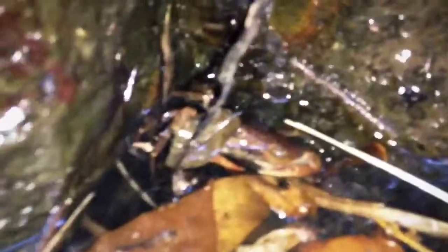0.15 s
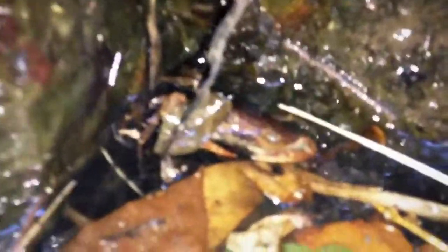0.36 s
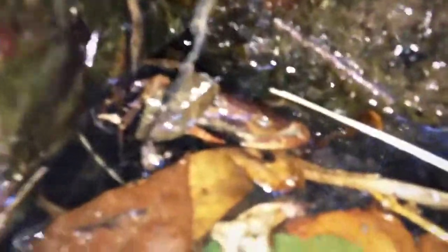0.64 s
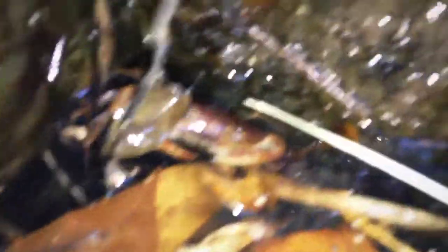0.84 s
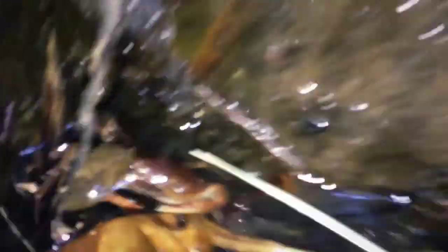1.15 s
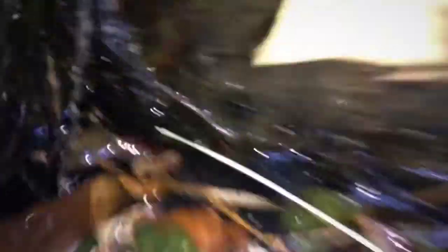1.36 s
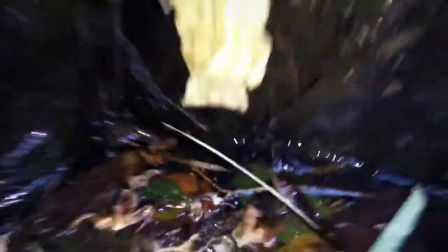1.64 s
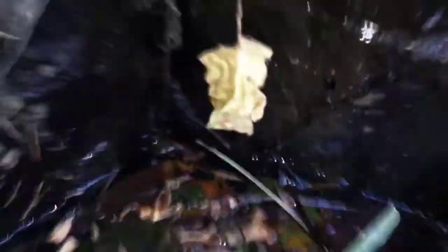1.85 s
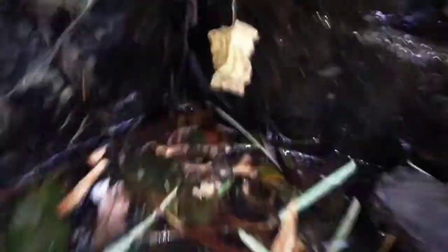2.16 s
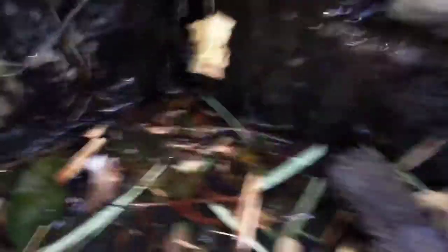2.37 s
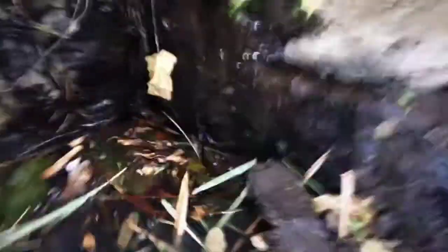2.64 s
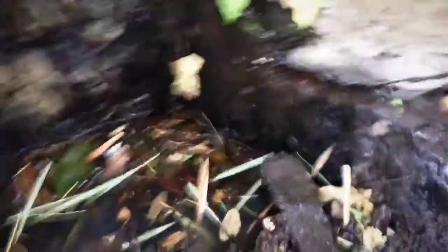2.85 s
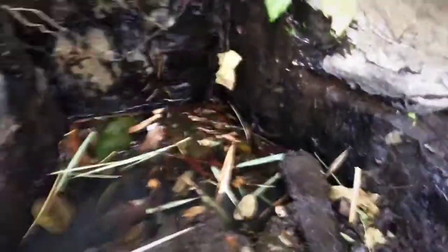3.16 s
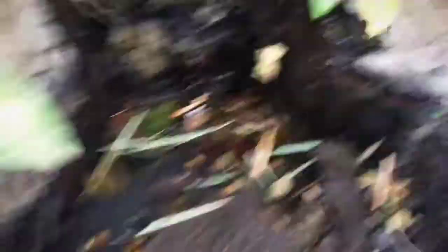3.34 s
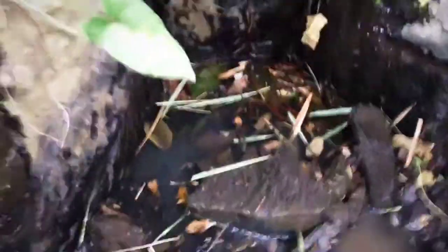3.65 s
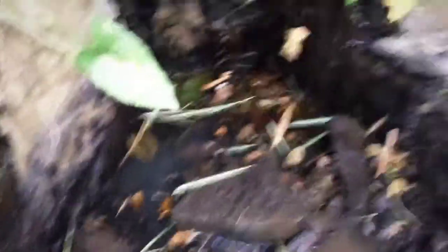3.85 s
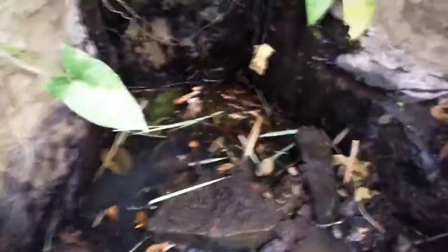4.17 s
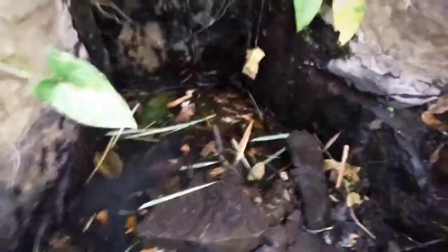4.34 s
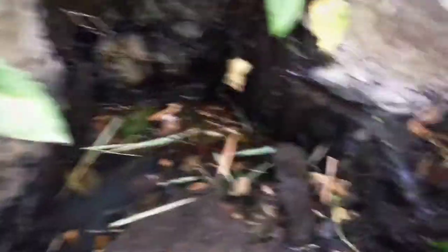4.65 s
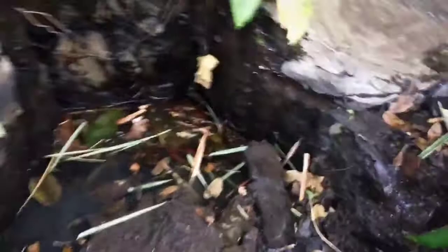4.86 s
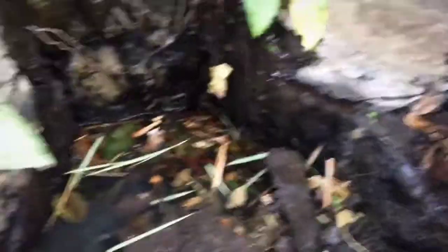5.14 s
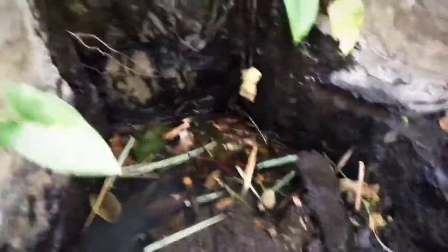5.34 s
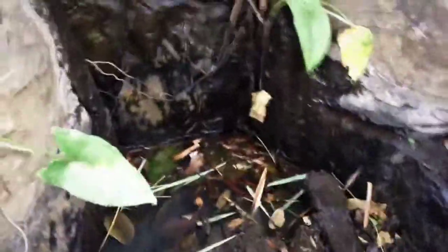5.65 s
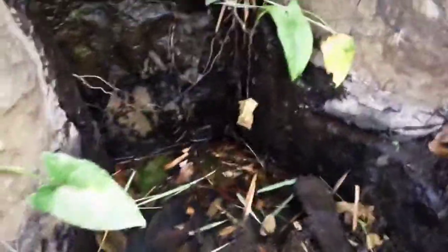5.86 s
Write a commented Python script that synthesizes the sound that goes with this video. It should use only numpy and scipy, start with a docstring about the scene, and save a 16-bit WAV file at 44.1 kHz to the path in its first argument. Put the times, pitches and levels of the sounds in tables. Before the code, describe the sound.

Outdoors, sodden leaf litter is disturbed near the microphone. Quiet fizzing ticks lead into thicker rustling and crunching with soft low thumps and a brief air rumble. A pause, then dense bright crackles and a loud twig crack, a few more crunches, and sparse dry clicks over a faint low murmur. The sound is dry and near, slightly boxy.

```python
"""Wet dead leaves squelch, rustle and fizz in swells close to a hand-held microphone, in a stone hollow by a pool.
Litter is filtered noise driven by tiny breaks, plus damped-sine pops; crunches are swelling noise bursts, snaps
sharp bursts with a ring. Damped tones thump through the ground and moving air rumbles on the microphone. A near
stone wall adds a dull echo of changing delay, the hollow its air modes."""
import sys
import numpy as np
from scipy import signal
from scipy.fft import rfft, irfft, next_fast_len
from scipy.io import wavfile
from scipy.ndimage import uniform_filter1d, map_coordinates

SR = 44100
rng = np.random.default_rng(int(sys.argv[2]) if len(sys.argv) > 2 else 0)


def store_pcm(level_fs):
    """Save levels as 16-bit WAV."""
    pcm = np.round(np.clip(level_fs, -1, 1) * 32767).astype(np.int16)
    wavfile.write(sys.argv[1], SR, np.atleast_2d(pcm).T)


def magnitude_from_level(level_db):
    """Linear magnitude for a level in decibels (20 dB per decade)."""
    exponent = np.asarray(level_db, float) / 20
    return 10 ** exponent


N = 264579  # samples


def unit(x):
    """Scaled to rms 1."""
    return x / np.sqrt(np.mean(x ** 2) + 1e-20)


def peaked(x):
    """Scaled to peak 1."""
    return x / np.abs(x).max()


def curves(rows):
    """One value per sample for each column after the time."""
    s, *columns = np.transpose(rows)
    return [np.interp(np.arange(N) / SR, s, column) for column in columns]


def coloured(x, points):
    """x filtered by (Hz, dB) points read on a log frequency axis."""
    hz, db = np.transpose(points)
    size = next_fast_len(x.shape[-1] + 8192)
    bin_hz = np.fft.rfftfreq(size, 1 / SR)
    gain = magnitude_from_level(np.interp(np.log(bin_hz + 1), np.log(hz), db))
    return irfft(rfft(x, size) * gain, size)[..., :x.shape[-1]]


def wobble(knots_per_s):
    """A smooth random curve through normally distributed knots."""
    position = np.arange(N) * knots_per_s / SR
    return map_coordinates(rng.standard_normal(200), [position])


def patchy(patchy_db):
    """Noise with random loud and quiet patches in time and frequency."""
    spectrum = signal.stft(rng.standard_normal(N), nperseg=256)[2]
    field = uniform_filter1d(rng.standard_normal(spectrum.shape), size=8, axis=0)
    field = uniform_filter1d(field, size=6, axis=1)
    return signal.istft(spectrum * magnitude_from_level(patchy_db * unit(field)), nperseg=256)[1][:N]


def cracks(rate_hz, spread_db, life_s):
    """Envelope of tiny fibre breaks: sudden starts, rare big ones, quick decay."""
    when, size = rng.random(N), rng.exponential(size=N)
    kicks = (when < rate_hz / SR) * magnitude_from_level(spread_db * np.minimum(size, 5))
    return unit(signal.lfilter([1], [1, -np.exp(-1 / (life_s * SR))], kicks))


def pops(count, centre_hz, cycles, spread_db):
    """Wet ticks of varied pitch: each a damped sine a few cycles long."""
    when, tone, size = rng.random((3, count, 1))
    hz = centre_hz * 2 ** (2.6 * (tone - 0.5))  # 2.6 octaves in all
    k = np.arange(1024)
    decay = np.exp(-k * hz / (cycles * SR))
    rings = magnitude_from_level(-spread_db * np.log(size + 0.0045)) * decay * np.sin(2 * np.pi * hz * k / SR)
    place = k + (when * N).astype(int)
    return unit(np.bincount(place.ravel(), rings.ravel())[:N])


def litter():
    """Three depths of litter under one stirring; the same fibre breaks are heard in all of them."""
    # Each row: time in seconds, level of the leaf layer in dB.
    stir_rows = [(0, -72.5), (0.3, -71), (0.55, -78), (0.8, -65.5), (0.91, -75), (1.15, -70), (1.45, -64),
                 (1.68, -55), (1.82, -60), (2.08, -53), (2.18, -48.5), (2.42, -47.5), (2.6, -42.5),
                 (2.68, -49), (2.82, -51.5), (2.94, -65), (3.15, -68.5), (3.39, -68.5), (3.44, -57),
                 (3.52, -45), (3.65, -40), (3.69, -56), (3.76, -43), (3.92, -45.5), (3.95, -49),
                 (4.06, -53.5), (4.12, -49.5), (4.19, -50.5), (4.3, -47.5), (4.41, -48.5), (4.5, -56),
                 (4.72, -55.5), (4.82, -66.5), (4.95, -57.5), (5.17, -67), (5.27, -63.5), (5.56, -68),
                 (5.64, -55), (5.8, -55), (6, -60)]
    # Each row: time in seconds, soggy layer over the leaves in dB, crisp edges over the leaves in dB.
    depth_rows = [(0, 0.5, -4), (0.33, -2.5, -1), (0.58, -0.5, -20), (0.8, -2, -3), (1.2, -4.5, -2.5),
                  (2.2, -2, -2.5), (2.5, -6.5, -4), (2.85, -2, 6.5), (3.3, -2, -2.5), (3.46, -14, 9.5),
                  (3.6, -8.5, 0), (3.8, -17, 0.5), (4.1, -8, -1.5), (4.35, -5, 7.5), (4.7, -2, 0.5),
                  (5.3, -2, 4), (6, -3.5, 2.5)]
    # Layer colours. Each row: frequency in Hz, relative density in dB.
    soggy_colour = [(120, -70), (230, -33), (330, -8), (500, -14.5), (750, -5.5), (1100, 0.5), (2000, 3.5),
                    (3500, -4), (8000, -13.5)]
    leaf_colour = [(250, -67), (800, -9), (1600, -12), (2500, 0.5), (4500, 3), (7000, 1), (11000, -4.5),
                   (16000, -30)]
    edge_colour = [(700, -79), (2500, -35), (5500, -1), (8000, 1), (11000, -0.5), (14500, 0), (15700, -9)]

    stir_db, = curves(stir_rows)
    soggy_db, edge_db = curves(depth_rows)
    slips = uniform_filter1d(cracks(rate_hz=150, spread_db=3.5, life_s=0.024), size=300)  # leaves slipping
    ticks = cracks(rate_hz=1300, spread_db=16.0, life_s=0.00033)  # single veins breaking

    def layer(colour, slip, tick):
        """Patchy noise driven by the shared slips and ticks."""
        drive = 1 + slip * slips + tick * ticks
        return unit(coloured(patchy(patchy_db=2.5) * drive, colour))

    soggy = magnitude_from_level(soggy_db + 1.5 * wobble(14)) * layer(soggy_colour, slip=0.45, tick=0.12)
    leaves = layer(leaf_colour, slip=0.6, tick=0.12)
    edges = magnitude_from_level(edge_db) * layer(edge_colour, slip=0.6, tick=0.25)
    wet = magnitude_from_level(-12.0) * pops(count=2500, centre_hz=3610, cycles=2.9, spread_db=4.5)
    squelch = magnitude_from_level(soggy_db - 9.5) * pops(count=500, centre_hz=1146, cycles=7.1, spread_db=2.0)
    return magnitude_from_level(stir_db) * (soggy + leaves + edges + wet + squelch)


def air():
    """Lumpy rumble on the microphone itself, and a low murmur of the surroundings."""
    # Each row: time in seconds, rumble level in dB, murmur level in dB.
    air_rows = [(0, -69, -67), (0.5, -69.5, -70), (1.0, -67.5, -65), (1.9, -66.5, -66),
                (2.12, -53.5, -68.5), (2.24, -48.5, -61.5), (2.5, -60, -65.5), (2.8, -65, -58),
                (3.0, -71.5, -73), (3.3, -73, -71), (3.8, -87, -68.5), (4.3, -61.5, -59.5), (4.7, -85, -66),
                (5.0, -73.5, -71), (5.6, -70, -68.5), (5.85, -65, -62.5), (6, -68, -70)]
    # Colours. Each row: frequency in Hz, relative density in dB.
    rumble_colour = [(20, -55), (40, -11), (70, -0.5), (95, -2.5), (130, -8.5), (250, -29.5)]
    murmur_colour = [(90, -35), (150, -7.5), (195, 1.5), (260, -5), (370, -2.5), (500, -5.5), (750, -10),
                     (1200, -27)]

    rumble_db, murmur_db = curves(air_rows)
    rumble = unit(magnitude_from_level(0.13 * wobble(9)) * coloured(rng.standard_normal(N), rumble_colour))
    murmur = unit(magnitude_from_level(1.5 * wobble(20)) * coloured(rng.standard_normal(N), murmur_colour))
    return magnitude_from_level(rumble_db) * rumble, magnitude_from_level(murmur_db) * murmur


def burst(shape, luck, hz, levels_db, sharp):
    """One break: broad crack, treble sizzle, the ring of that piece and a low knock under one envelope."""
    # Colours of the parts. Each row: frequency in Hz, relative density in dB.
    crack_colour = [(100, -68), (500, -54), (1500, -0.5), (3000, 6.5), (6000, 9), (9000, 3.5), (17000, -48)]
    sizzle_colour = [(500, -70), (3000, -69), (7000, 8), (9000, 11), (14000, 6), (15700, -3)]
    knock_colour = [(60, -74), (150, -12), (300, -4.5), (600, -2.5), (1200, 1.5), (2200, -1.5), (5000, -32)]

    ring_colour = [(hz / 8, -80), (hz / 2, -36), (hz / sharp, -6), (hz, 0), (hz * sharp, -6), (hz * 2, -36)]
    colours = [crack_colour, sizzle_colour, ring_colour, knock_colour]
    total = 0
    for noise, colour, db in zip(luck, colours, levels_db):
        total = total + magnitude_from_level(db) * coloured(noise * shape, colour) / np.std(coloured(noise, colour))
    return total


def crunches():
    """A crunch swells and fades as many small breaks follow one another; a longer one swells longer."""
    # Leaves crushed. Each row: start in seconds, peak in dB, ring in Hz, relative low knock in dB, t60 in seconds.
    crunch_rows = [(0.074, -52.5, 8220, -2, 0.11), (0.823, -47, 4100, -5, 0.062),
                   (0.965, -43.5, 5800, -13, 0.11), (0.9996, -48, 3390, -1, 0.08),
                   (1.3234, -38, 3460, -16, 0.098), (1.3495, -40, 3960, -11.5, 0.11),
                   (1.3732, -41.5, 3960, -12, 0.051), (1.4209, -37, 8060, -15, 0.081),
                   (1.534, -34.5, 2120, -9, 0.075), (1.5632, -34, 2240, -18, 0.041),
                   (1.619, -46, 3900, -20, 0.074), (1.769, -36.5, 4650, -14, 0.034),
                   (1.8417, -43, 1510, -6, 0.043), (1.9435, -33.5, 4430, -6.5, 0.2),
                   (2.0171, -30, 2260, -18, 0.044), (2.1112, -35, 2130, -16, 0.24),
                   (2.1648, -38, 2030, 2, 0.17), (2.256, -29, 3920, -7, 0.032),
                   (2.2889, -28, 2120, -5, 0.024), (2.3742, -35, 1820, -12, 0.049),
                   (2.4715, -25, 3700, -4.5, 0.055), (2.501, -27, 3460, -12.5, 0.033),
                   (2.5595, -29.5, 3730, -5.5, 0.31), (2.619, -28, 6900, -16.5, 0.066),
                   (2.8145, -33.5, 1650, -11, 0.054), (2.9886, -46.5, 5340, -6, 0.16),
                   (3.399, -36, 8010, -15, 0.19), (3.418, -22.5, 12000, -27, 0.13),
                   (3.5346, -26.5, 8300, -7.5, 0.028), (3.598, -28.5, 1820, -18, 0.24),
                   (3.6375, -27, 6700, -17.5, 0.17), (3.8344, -33, 6560, -31, 0.099),
                   (3.8618, -29, 4800, -20, 0.068), (4.204, -29, 1880, -16, 0.095),
                   (4.2308, -31, 9900, -5, 0.15), (4.2569, -32.5, 1430, 5, 0.051),
                   (4.3847, -32.5, 6400, -6, 0.074), (4.4294, -40, 10500, 2, 0.098),
                   (4.7029, -34.5, 2900, -3, 0.054), (4.9019, -25, 5400, 0, 0.076),
                   (4.9093, -26, 1990, -6.5, 0.11), (4.9507, -34, 5900, -7, 0.03),
                   (4.9896, -45, 8480, -13, 0.11), (5.6385, -35.5, 13200, -11, 0.17),
                   (5.6655, -38, 2140, -7, 0.092), (5.7544, -29, 8000, -38, 0.047)]

    out, t = np.zeros(N + SR), np.arange(SR // 6) / SR
    luck = rng.standard_normal((len(crunch_rows), 5, len(t)))
    for (s, db, hz, knock_db, t60_s), (grit, *noise) in zip(crunch_rows, luck):
        rise_s = 0.003 + 0.05 * t60_s
        swell = np.sin(np.pi / 2 * np.minimum(t / rise_s, 1)) ** 2
        fade = magnitude_from_level(-60 * np.maximum(t - rise_s, 0) / t60_s)
        uneven = magnitude_from_level(2 * unit(uniform_filter1d(grit, size=24)))  # 2 dB rms
        crunch = burst(swell * fade * uneven, noise, hz, [-4, -6, -7, knock_db], sharp=0.88)
        out[round(s * SR):][:len(t)] += magnitude_from_level(db) * peaked(crunch)
    return out[:N]


def snaps():
    """A snap starts at once, sets the twig ringing briefly and leaves a faint settling."""
    # Twigs and veins. Each row: start in seconds, peak in dB, ring in Hz, relative low knock in dB,
    # relative treble in dB.
    snap_rows = [(0.361, -53, 7600, -18, 0), (0.4189, -44.5, 880, -4, -7), (1.1362, -45.5, 7200, -28, -14),
                 (1.816, -36.5, 1440, -13, 3), (1.9428, -35, 850, -14, 0), (2.457, -26.5, 1155, 10, -20),
                 (2.7276, -21, 2020, 5.5, 0.5), (2.974, -42, 2800, -19, 0), (3.1334, -40.5, 5600, -21, -8),
                 (3.2055, -43.5, 5770, -22, -5), (3.3401, -24, 1520, -9.5, -10),
                 (3.709, -27.5, 3340, -42, -14), (3.7261, -20.5, 7550, -40, -4),
                 (3.7525, -15.5, 3100, -36, -7.5), (3.7626, -22.5, 4800, -10, -11),
                 (3.7939, -7.5, 12800, -10, -10), (3.875, -26, 2360, -7, -27), (3.89, -21, 6230, -6.5, -3),
                 (3.915, -24, 4860, -33, 2), (3.961, -24, 7600, -26, 4), (4.0033, -20, 3810, -37, -4.5),
                 (4.0139, -27.5, 2540, -1, 1), (4.0632, -35, 2460, -13, -11), (4.0988, -27, 4920, -15, -11),
                 (4.1184, -22, 3360, -35, -7), (4.1506, -28, 1395, -27, -14), (4.286, -35, 6100, -16, 0),
                 (4.4622, -31.5, 925, 4, -13), (4.5528, -33.5, 5830, -15, -3), (4.5872, -28, 6900, -5, 3),
                 (4.837, -43, 2550, -5, -8), (4.8696, -40.5, 1630, -6, -13), (5.0272, -39.5, 6550, -8, -9),
                 (5.2116, -42, 7120, -20, -3), (5.353, -39.5, 3500, -16, -9), (5.3908, -43, 6270, -14, -1),
                 (5.418, -38, 6770, -14.5, -18), (5.4583, -38, 8800, -7, -6),
                 (5.5415, -39.5, 1580, -20, -10), (5.7009, -50, 6100, 3, -8), (5.827, -36, 5030, -12, -5),
                 (5.854, -39, 5630, -11, -9)]
    snap_t60_s, settle_t60_s, settle_db = 0.025, 0.13, -14

    out, t = np.zeros(N + SR), np.arange(SR // 10) / SR
    luck = rng.standard_normal((len(snap_rows), 4, len(t)))
    luck[:, :, 0] = 3.5  # the break itself is one sharp step
    decay = magnitude_from_level(-60 * t / snap_t60_s)
    settling = magnitude_from_level(settle_db - 60 * t / settle_t60_s)
    for (s, db, hz, knock_db, treble_db), noise in zip(snap_rows, luck):
        noisy = burst(decay + settling, noise, hz, [-4.1, treble_db, -9, knock_db], sharp=1.3)
        ring = magnitude_from_level(-4.5) * decay ** 0.8 * np.sin(2 * np.pi * hz * t)
        out[round(s * SR):][:len(t)] += magnitude_from_level(db) * peaked(noisy + ring)
    return out[:N]


def thumps():
    """A shift of weight sets soft ground ringing: a damped sine with a weaker one below it."""
    # Each row: start in seconds, strength in dB, pitch in Hz, t60 in seconds.
    thump_rows = [(1.324, -39.5, 497, 0.041), (1.838, -39, 562, 0.062), (2.192, -35.5, 93, 0.14),
                  (2.31, -43.5, 90, 0.087), (2.38, -38, 92.5, 0.063), (3.794, -33, 384, 0.046),
                  (4.237, -32, 188, 0.058), (4.245, -35, 93, 0.07), (4.587, -57, 177, 0.5),
                  (4.7, -35, 198, 0.046), (4.911, -27, 399, 0.047), (5.664, -40.5, 177, 0.086)]

    out, t = np.zeros(N + SR), np.arange(SR // 4) / SR
    for s, db, hz, t60_s in thump_rows:
        push = (1 - np.exp(-t / 0.0055)) * magnitude_from_level(db - 60 * t / t60_s)
        tone = np.sin(2 * np.pi * hz * t) + 0.31 * np.sin(2 * np.pi * 0.55 * hz * t)
        out[round(s * SR):][:len(t)] += push * tone
    return out[:N]


def wall(x):
    """A dull delayed echo combs the sound, its null moving with the extra path; the hollow adds its air modes."""
    # Each row: time in seconds, extra path of the echo in ms, echo strength as a factor, hollow ringing as a factor.
    wall_rows = [(0, 0.25, 0.05, 0.092), (1.2, 0.39, 0, 0.071), (1.7, 1.24, 0.6, 0.12),
                 (2.0, 1.22, 0.97, 0.38), (2.2, 1.5, 0, 3.2), (2.7, 1.5, 0.32, 1.2),
                 (3.0, 1.13, 0.05, 0.12), (4.4, 2.1, 0.2, 0.33), (6, 2.4, 0.07, 0.53)]
    # Filters of echo and air modes. Each row: frequency in Hz, gain in dB.
    stone_colour = [(20, 18), (1200, -9), (3000, -25), (20000, -28)]
    hollow_colour = [(290, -68), (357, 3.5), (430, -44), (620, -60), (740, -2.5), (860, -15), (1070, -3.5),
                     (1300, -30)]

    delay_ms, strength, boom = curves(wall_rows)
    position = np.arange(N) - delay_ms * SR / 1000
    echo = map_coordinates(coloured(x, stone_colour), [position], order=3)
    return x + strength * echo + boom * coloured(x, hollow_colour)


def scene():
    """All sources reach one microphone; thumps and rumble bypass the wall."""
    rumble, murmur = air()
    reflected = wall(litter() + crunches() + snaps() + murmur)
    return (reflected + thumps() + rumble)[None]


def roll_off(x):
    """The treble ends steeply here."""
    return signal.sosfilt(signal.butter(12, 16460, fs=SR, output="sos"), x)


def record(dry):
    """Low cut and band limit give the finished mix."""
    top_hz = 15450
    band = [(20, -14), (55, 0), (top_hz, 0), (top_hz + 250, -25), (top_hz + 900, -80)]
    mix = coloured(dry, band)
    return roll_off(mix)


dry = scene()
out = record(dry)
store_pcm(out)
```